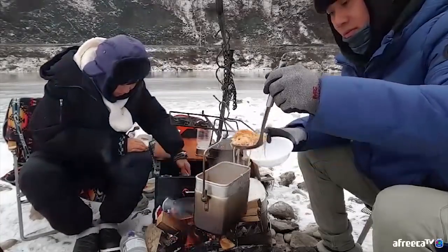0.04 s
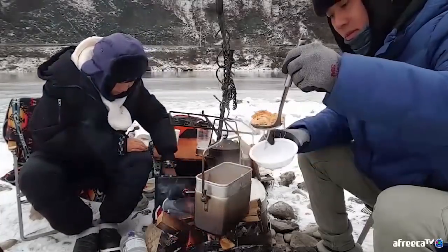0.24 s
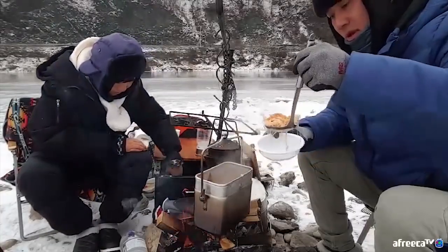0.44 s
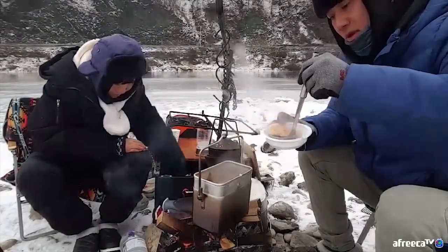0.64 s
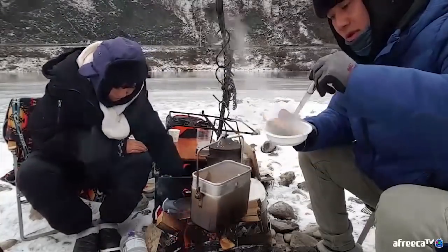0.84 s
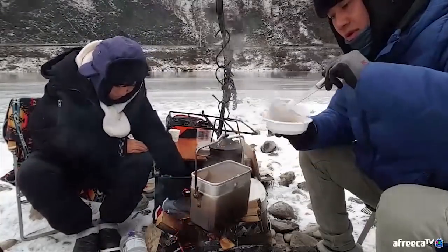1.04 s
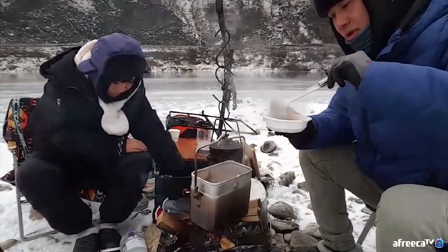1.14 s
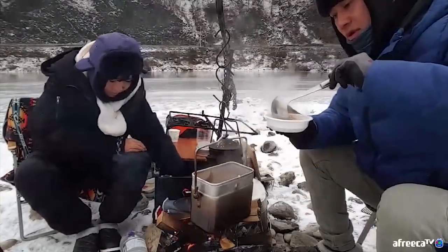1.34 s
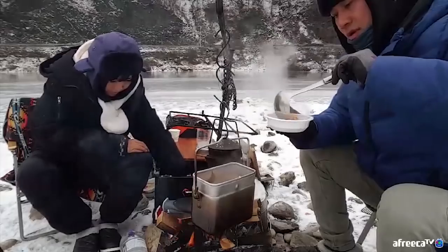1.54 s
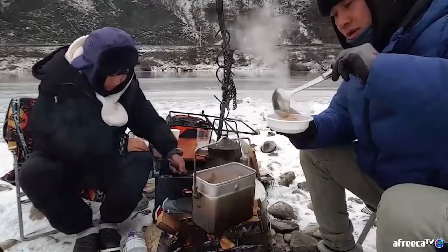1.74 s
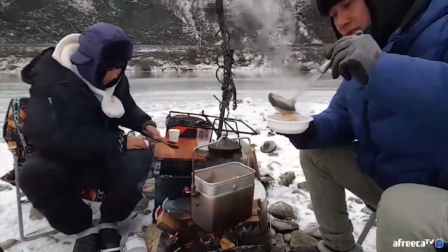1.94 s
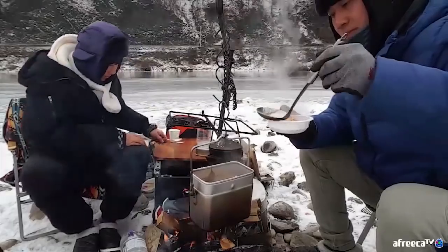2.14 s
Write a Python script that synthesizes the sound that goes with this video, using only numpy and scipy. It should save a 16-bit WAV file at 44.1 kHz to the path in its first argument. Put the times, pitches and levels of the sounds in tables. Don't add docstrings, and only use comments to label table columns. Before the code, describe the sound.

A metal ladle knocks a half-full tin pot: after near quiet, low hollow booms with a crack at 0.23-0.3 s, weaker knocks at 0.44 and 0.6. From 0.7 s, short clinks and gritty rubs; food thumps hollowly at 1.06. Clinks at 1.15 and 1.3, a snap at 1.53, light ticks, then a bright double clink at 1.82. Faint fire rumble, hiss and tiny pops remain; dry outdoors, close, treble cut.

```python
import sys
import numpy as np
from scipy import signal
from scipy.io import wavfile
from scipy.ndimage import uniform_filter1d

SR = 44100
rng = np.random.default_rng(int(sys.argv[2]) if len(sys.argv) > 2 else 0)


def decibels_to_gain(level_db):
    exponent = np.asarray(level_db, float) / 20
    return 10 ** exponent


def master_out(mix):
    frames = np.transpose(np.atleast_2d(mix))
    ceiling = np.clip(frames, -1, 1)
    pcm = np.round(ceiling * 32767).astype(np.int16)
    wavfile.write(sys.argv[1], SR, pcm)


N = 97020

# t/s, boom level/dB, wall level/dB, crack level/dB, rattle decay/s
KNOCKS = [(0.2298, -14, -14, -20.5, 0.015), (0.244, -27.5, -23.5, -39.5, 0.014),
          (0.252, -10, -21, -34, 0.047), (0.286, -24.5, -34, -38.5, 0.021),
          (0.321, -21.5, -47, -49.5, 0.08), (0.374, -45, -41, -43.5, 0.023), (0.438, -12, -26, -28, 0.0097),
          (.58, -19, -24.5, -34.5, 0.0077), (0.588, -23.5, -31, -41.5, 0.014),
          (.607, -28.5, -35, -53, 0.036), (1.06, -37, -20.5, -37, 0.014), (1.522, -33.5, -30, -40.5, 0.013)]
# f/Hz, level/dB, t60/s
BOOM_MODES = [(94, -21.5, 0.6), (144, -20, 0.21), (159.5, -1, 0.24)]
# f/Hz, level/dB, t60/s
WALL_MODES = [(236.1, -3, 0.17), (310.4, -8.5, 0.13), (430.4, -10, 0.12), (469, -0.5, 0.029),
              (551, -14, 0.087), (650.5, 2, 0.032), (793, -15.5, 0.26), (870, -4, 0.032)]


def knocks():
    s, boom_db, wall_db, crack_db, rattle_s = np.transpose(KNOCKS)
    contact = swell(s, 0.00031, rattle_s)
    wall = body(lambda hz: contact @ decibels_to_gain(wall_db - 27), WALL_MODES)
    boom = blows(s, boom_db, BOOM_MODES)
    dull_crack = band(rng.standard_normal(N), 510, 3520)
    bright_crack = band(rng.standard_normal(N), 2500, 9100)
    crack = rms_one(dull_crack + 0.22 * bright_crack)
    return above(band(wall - boom, 25, 1700), 61) + crack * (contact @ decibels_to_gain(crack_db))


# t/s, bowl level/dB, shank level/dB, fall/s, favoured bowl f/Hz
CLINKS = [(0.699, -29, -41.5, 0.026, 695), (0.803, -38, -60, 0.011, 694), (0.849, -22.5, -19, 0.021, 742),
          (0.999, -49, -28.5, 0.02, 800), (1.039, -28.5, -26, 0.062, 760), (1.061, -33, -28, 0.0069, 800),
          (1.398, -31.5, -50, 0.017, 730), (1.467, -40, -33.5, 0.0059, 800), (1.151, -18, -26, 0.022, 716),
          (1.298, -17.5, -25.5, 0.022, 689), (1.547, -41.5, -42, 0.0042, 800),
          (1.742, -39, -34.5, 0.011, 800), (1.821, -17, -24.5, 0.0069, 903), (1.829, -23, -30, 0.025, 860),
          (1.861, -31, -36, 0.017, 800)]
# t/s, bowl level/dB, shank level/dB, fall/s, favoured bowl f/Hz
RUBS = [(0.836, -32.5, -35.5, 0.022, 800), (.89, -38, -35, 0.021, 726), (0.903, -22.5, -27, 0.012, 778),
        (.93, -30.5, -36.5, 0.024, 714), (0.948, -27.5, -28, 0.0084, 713), (.972, -39, -45.5, 0.014, 845),
        (1.332, -32, -36.5, 0.019, 716), (1.354, -39, -44.5, 0.011, 750), (1.413, -31.5, -48, 0.018, 716),
        (1.488, -35.5, -26, 0.023, 800), (1.611, -43.5, -38, 0.013, 800), (1.777, -44, -33.5, 0.0091, 790),
        (1.815, -46, -35, 0.0091, 800)]
# f/Hz, level/dB, t60/s
BOWL_MODES = [(721, -11.5, 0.077), (735, -2, 0.033), (790, -1.5, 0.041), (845, -5, 0.033),
              (969.3, 1.5, 0.098)]
# f/Hz, level/dB, t60/s
SHANK_MODES = [(1159, -6, 0.043), (1296, -5, 0.016), (1453, -5, 0.016), (1686, -5, 0.011),
               (1877, -1.5, 0.032), (1876, -14, 0.051), (2250, -19.5, 0.0077), (2560, -6.5, 0.022),
               (3050, -7, 0.017), (3517, -7.5, 0.021), (4050, -12.5, 0.033), (5910, -11, .012),
               (7200, -14.5, 0.0034), (8540, -19, 0.0049)]
# t/s, level/dB
DRAG = [(0.779, -64), (.86, -65), (1.02, -44), (1.19, -57.5), (1.219, -64.5), (1.439, -55.5), (1.56, -45),
        (1.66, -43), (1.729, -45.5), (1.8, -45), (1.899, -50)]
# f/Hz, level/dB, t60/s
DRAG_MODES = [(800, -7, 0.066), (1223, -9, 0.032), (1422, -0.5, 0.018), (1720, 0.5, 0.03),
              (1790, -8.5, 0.017), (1900, -1, 0.024), (2570, -13, 0.038), (3572, -4.5, 0.041)]
CLINK_RISE_S, RUB_RISE_SHARE = 0.003, 0.59
FAVOUR_WIDTH_HZ, COLOUR_DB = 56.8, 1.5
GRIT_DB, GRIT_CUT_HZ = -11.5, 5900


def ladle():
    s, bowl_db, shank_db, fall_s, favour_hz = np.transpose(CLINKS + RUBS)
    is_clink = np.arange(len(s)) < len(CLINKS)
    contact = swell(s, np.where(is_clink, CLINK_RISE_S, RUB_RISE_SHARE * fall_s), fall_s)

    drag_s, drag_db = np.transpose(DRAG)
    drag_level = np.interp(np.arange(N) / SR, drag_s, drag_db, left=-90, right=-90)
    drag = decibels_to_gain(drag_level + 2 * drift(30))

    def bowl_force(hz):
        detuning = (hz - favour_hz) / FAVOUR_WIDTH_HZ
        return contact @ decibels_to_gain(bowl_db - 23.0 - 5.5 * detuning ** 2)

    def shank_force(hz):
        return contact @ decibels_to_gain(shank_db - 24.5 + COLOUR_DB * rng.standard_normal(len(s)))

    bowl = body(bowl_force, BOWL_MODES)
    shank = body(shank_force, SHANK_MODES)
    sung = body(lambda hz: decibels_to_gain(-20) * drag * decibels_to_gain(4.8 * drift(11)), DRAG_MODES)
    rubbing = contact @ decibels_to_gain(shank_db) + 0.31 * drag
    grit = decibels_to_gain(GRIT_DB) * rubbing * rms_one(band(grains(), 500, GRIT_CUT_HZ))
    return above(bowl + shank + sung + grit, 368)


# t/s, f/Hz, level/dB, t60/s
PINGS = [(.2311, 3400, -10.5, 0.0022), (.2312, 435, -18, 0.087), (0.235, 145, -12.5, 0.12),
         (0.8492, 3020, -15.5, .004), (.851, 688, -17.5, 0.055), (.958, 837, -34, 0.17),
         (1.046, 1913, -23, 0.13), (1.0606, 1903, -26, 0.1), (1.151, 3050, -24, 0.043),
         (1.5316, 6850, -20, 0.0061), (1.0601, 320, -20.5, 0.029), (.233, 860, -19, 0.053),
         (.236, 240, -16.5, 0.22), (.245, 765, -23.5, 0.21), (.26, 243, -15, 0.16),
         (.268, 312, -21.5, 0.24), (.278, 772, -19, 0.14), (.262, 543, -28, 0.18), (.29, 768, -29.5, 0.16),
         (.442, 648, -30, 0.054), (.45, 526, -31, .06), (.62, 155, -24.5, 0.16), (1.3, 708, -26, 0.06),
         (1.735, 2550, -38, 0.05), (.265, 1113, -28.5, 0.11), (1.06, 484, -18.5, 0.18),
         (1.821, 2800, -22.5, 0.036), (1.82, 3050, -24.5, 0.035), (1.83, 6100, -35, .03),
         (1.859, 4400, -34.5, 0.039), (1.857, 6760, -36.5, 0.078), (1.772, 790, -34.5, 0.084),
         (.366, 710, -33.5, 0.043), (.372, 1900, -36, 0.025), (0.433, 2580, -46, 0.012),
         (1.037, 183, -22, 0.22), (1.038, 3050, -26, 0.081), (1.089, 4100, -37.5, 0.044),
         (1.153, 735, -39, 0.069), (1.519, 89, -19, 0.055), (1.82, 2250, -13, 0.018),
         (1.821, 7200, -31, 0.021), (1.83, 1159, -16, 0.062), (1.835, 6730, -33, 0.14),
         (1.834, 6560, -39, 0.13), (1.831, 1934, -15.5, 0.13)]


def pings():
    return above(sum(blows([s], db, [(hz, 0, t60)]) for s, hz, db, t60 in PINGS), 95)


# t/s, level/dB
TICKS = [(1.0015, -39), (1.016, -31.5), (1.048, -30.5), (1.0625, -41.5), (1.069, -34.5), (1.309, -31),
         (1.466, -33), (1.4855, -22), (1.568, -41), (1.594, -38.5), (1.610, -34), (1.6605, -42),
         (1.69, -39.5), (1.711, -43), (1.7405, -29.5), (1.752, -39), (1.812, -36.5), (1.829, -25),
         (.862, -31), (.903, -36.5), (.95, -40)]
# f/Hz, level/dB, t60/s
TICK_MODES = [(795, -10.5, 0.16), (1496, -13, 0.036), (1727, -2, 0.083), (1873, -3, 0.098),
              (2523, -8, 0.047), (3500, -8.5, 0.046)]
TICK_COLOUR_DB = 3.0


def ticks():
    s, db = np.transpose(TICKS)
    colour = TICK_COLOUR_DB * rng.standard_normal((len(s), len(TICK_MODES)))
    return sum(blows(s, db + colour[:, k], [mode]) for k, mode in enumerate(TICK_MODES))


# multiple of the final pitch, level/dB
PLOP_OVERTONES = [(1, -0.5), (2.6, -15), (3.15, -17.5), (4.3, -14)]
PLOP_S, PLOP_DB, PLOP_HZ = 1.0597, -7, 145.5
PLOP_GLIDE, PLOP_GLIDE_S = 0.35, 0.008
PLOP_RISE_S, PLOP_T60_S = 0.0017, 0.14


def plop():
    t = np.maximum(np.arange(N) / SR - PLOP_S, 0)
    glide = PLOP_GLIDE * PLOP_GLIDE_S * (1 - np.exp(-t / PLOP_GLIDE_S))
    turns = PLOP_HZ * (t + glide)
    thump = 0
    for multiple, db in PLOP_OVERTONES:
        decay_db = 60 * t / PLOP_T60_S * multiple ** 0.18
        thump = thump + decibels_to_gain(PLOP_DB + db - decay_db) * np.sin(2 * np.pi * multiple * turns)
    return thump * (1 - np.exp(-t / PLOP_RISE_S))


# t/s, level/dB, centre f/Hz, t60/s
CRACKLES = [(0.618, -26, 1400, 0.019), (0.619, -33, 4100, 0.013), (0.658, -41, 6500, 0.0055),
            (0.718, -41, 1900, 0.019), (1.5323, -19.5, 6900, 0.0035), (1.5325, -27.5, 3000, 0.0083),
            (1.536, -32, 7200, 0.0053), (2.01, -46.5, 3220, .012), (2.09, -47, 2400, 0.012),
            (2.122, -40, 1460, 0.014), (2.119, -42.5, 5700, 0.02)]


def pops():
    out = 0
    for s, db, hz, t60 in CRACKLES:
        burst = rms_one(band(rng.standard_normal(N), hz / 1.7, hz * 1.7))
        out = out + decibels_to_gain(db) * burst * swell(s, 0.00018, t60 / 4)[:, 0]
    return out


ECHO_DB, ECHO_T60_S = -19.5, 0.12


def echoes(x):
    t = np.arange(SR // 2) / SR
    tail = band(rng.standard_normal(len(t)), 380, 4700) * decibels_to_gain(-60 * t / ECHO_T60_S) * (t > .004)
    return decibels_to_gain(ECHO_DB) * signal.fftconvolve(x, tail / np.sqrt(np.sum(tail ** 2)))[:N]


# f/Hz, level/dB, t60/s
EARLIER = [(800, -52, 0.28), (1348, -59, 0.65), (2040, -60, 5), (2080, -62.5, 1.2), (2980, -56.5, 0.16)]
EARLIER_STOP_S, EARLIER_STOP_WIDTH_S = .18, 0.012


def earlier():
    t = np.arange(N) / SR
    tones = 0
    for hz, db, t60 in EARLIER:
        tones = tones + decibels_to_gain(db - 60 * t / t60) * np.sin(2 * np.pi * (hz * t + rng.random()))
    return tones / (1 + np.exp((t - EARLIER_STOP_S) / EARLIER_STOP_WIDTH_S).clip(0, 1e9))


# t/s, level/dB
RUMBLE = [(0.0, -65), (0.27, -55), (0.4, -43), (0.45, -43), (0.64, -43.5), (1.12, -35.5), (1.47, -43),
          (2.2, -45.5)]


def rumble():
    low = rms_one(band(rng.standard_normal(N), 32, 395))
    level_db = np.interp(np.arange(N) / SR, *np.transpose(RUMBLE))
    return low * decibels_to_gain(level_db - 7.5 + 2.8 * drift(11.3))


# f/Hz, spectral level/dB
AIR = [(20, -23), (40, -7.5), (65, 2), (130, -3), (260, -22), (900, -23), (1500, -31.5), (9800, -43.5)]
# t/s, level/dB
HISS = [(0.0, -100), (0.28, -37.5), (0.399, -34.5), (0.84, -43), (1.03, -42), (1.26, -43), (1.72, -39),
        (1.87, -40), (2.2, -46.5)]
AIR_DB, HISS_LOW_HZ = -44, 398


def air():
    hz, db = np.transpose(AIR)
    edges = 20 * 2 ** np.arange(0, 9.6, .5)
    white = rng.standard_normal((2, N + SR))
    out = 0
    for k, (low, high) in enumerate(zip(edges, edges[1:])):
        level = np.interp(np.log(low * high) / 2, np.log(hz), db)
        out = out + decibels_to_gain(level + 3.3 * drift(6.7)) * band(white[k % 2], low, high)[SR:]
    hiss = rms_one(band(rng.standard_normal(N), HISS_LOW_HZ, 6070))
    hiss_db = np.interp(np.arange(N) / SR, *np.transpose(HISS)) - 13.5
    return decibels_to_gain(AIR_DB) * rms_one(out) + hiss * decibels_to_gain(hiss_db)


def body(force, modes):
    return sum(decibels_to_gain(db) * ring(grains() * force(hz), hz, t60) for hz, db, t60 in modes)


def blows(s, db, modes):
    blow = np.zeros(N)
    blow[(np.asarray(s) * SR).astype(int)] = decibels_to_gain(db)
    return sum(decibels_to_gain(level_db) * ring(blow, hz, t60) for hz, level_db, t60 in modes)


def ring(force, hz, t60):
    r, w = decibels_to_gain(-60 / (t60 * SR)), 2 * np.pi * hz / SR
    return signal.lfilter([0, np.sin(w)], [1, -2 * r * np.cos(w), r * r], force + 1e-18)


GRAINS_PER_S, GRAIN_SPREAD_DB = 3500, 4


def grains():
    sizes = decibels_to_gain(GRAIN_SPREAD_DB * np.minimum(rng.exponential(1, N), 4)) * rng.choice([-1, 1], N)
    return rms_one(sizes * (rng.random(N) < GRAINS_PER_S / SR))


FALL_SHAPE = 1.74


def swell(s, rise, fall):
    t = np.arange(N)[:, None] / SR - s
    return np.exp(np.where(t < 0, t / rise, -np.abs(t / fall) ** FALL_SHAPE))


def drift(rate):
    r = np.exp(-80 * np.pi * rate / SR)
    slow = signal.lfilter([1], [1, -2 * r, r * r], rng.standard_normal(N // 40 + 2002))[2000:]
    return np.interp(np.arange(N) / 40, np.arange(len(slow)), rms_one(slow))


def rms_one(x):
    return x / np.sqrt(np.mean(x ** 2) + 1e-20)


def band(x, low_hz, high_hz):
    edges = [low_hz, min(high_hz, .45 * SR)]
    return signal.sosfilt(signal.butter(2, edges, "band", fs=SR, output="sos"), x)


def above(x, hz):
    return signal.sosfilt(signal.butter(4, hz, "high", fs=SR, output="sos"), x)


def scene():
    near = knocks() + ladle() + pings() + ticks() + plop() + pops()
    return (near + echoes(near) + earlier() + air() + rumble())[None]


MASK_FROM_HZ, MASK_BUSY_DB, MASK_CALM_DB = 2300, -3.5, -6.5


def masked(x):
    hz, _, z = signal.stft(x, SR, nperseg=1024)
    power = uniform_filter1d(np.abs(z) ** 2, size=2, axis=1)
    busy = power[hz > 500].sum(axis=0)
    under_db = np.where(busy > np.median(busy), MASK_BUSY_DB, MASK_CALM_DB)
    local = uniform_filter1d(power, size=5, axis=0)
    neighbours = uniform_filter1d(power, size=41, axis=0)
    weak = local < decibels_to_gain(2 * under_db) * neighbours
    dropped = weak & (hz[:, None] > MASK_FROM_HZ)
    return signal.istft(z * ~dropped, SR, nperseg=1024)[1][:N]


def roll_off(x):
    return signal.sosfilt(signal.butter(12, 9800, fs=SR, output="sos"), x)


CUTOFF_HZ = 9900


def record(dry):
    top_cut = signal.cheby2(16, 50, CUTOFF_HZ, fs=SR, output="sos")
    mix = signal.sosfilt(top_cut, masked(dry[0])[None])
    return roll_off(mix)


dry = scene()
out = record(dry)
master_out(out)
```